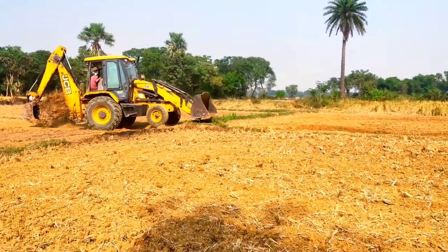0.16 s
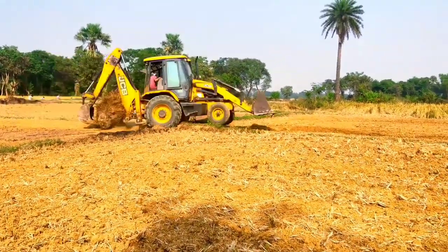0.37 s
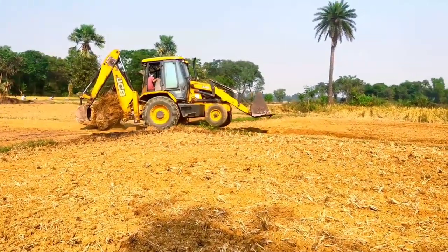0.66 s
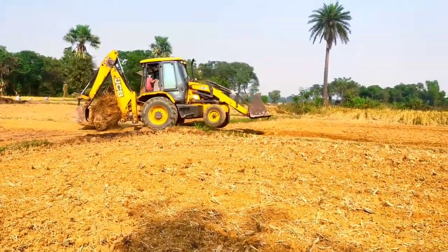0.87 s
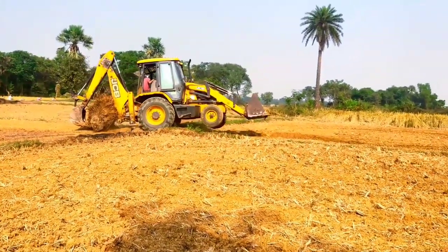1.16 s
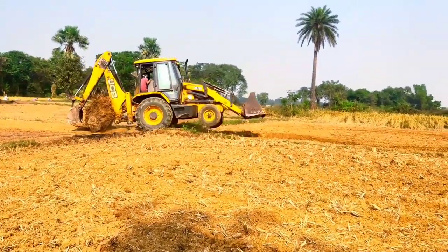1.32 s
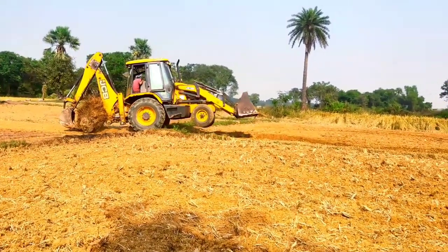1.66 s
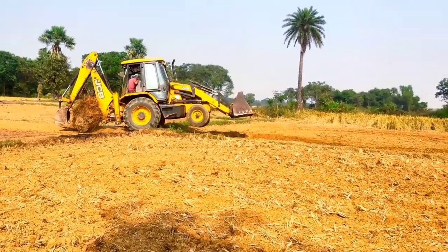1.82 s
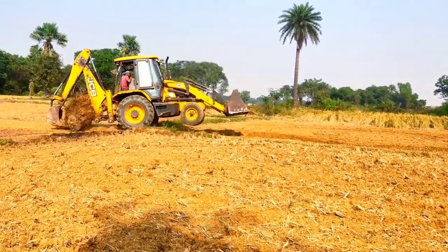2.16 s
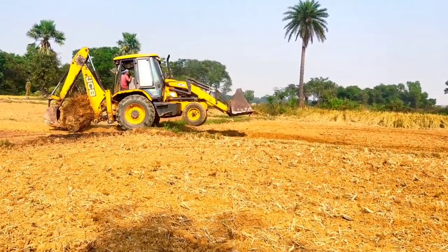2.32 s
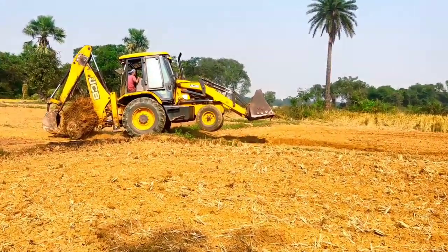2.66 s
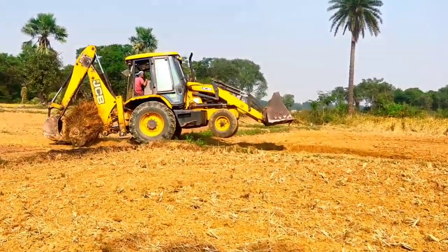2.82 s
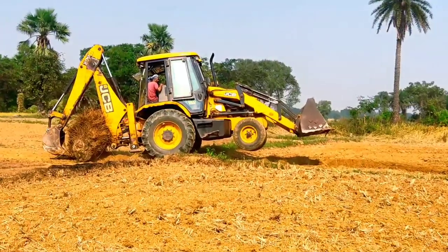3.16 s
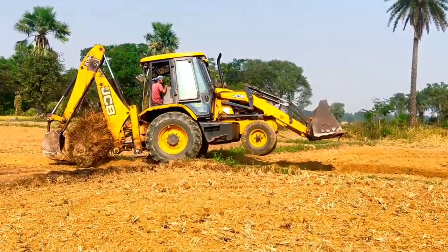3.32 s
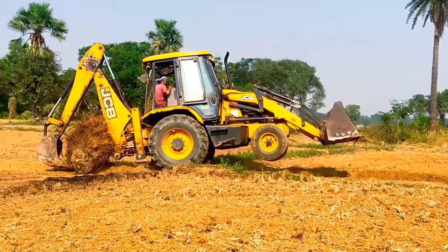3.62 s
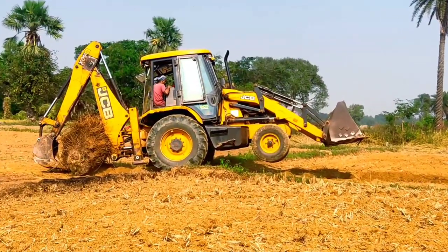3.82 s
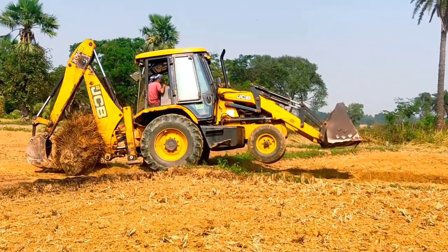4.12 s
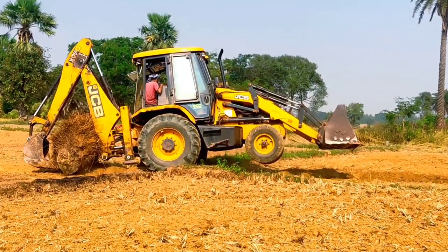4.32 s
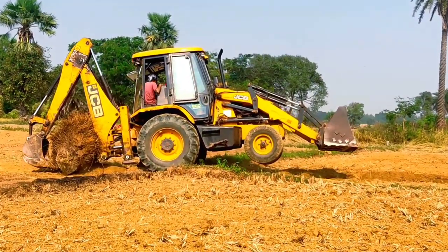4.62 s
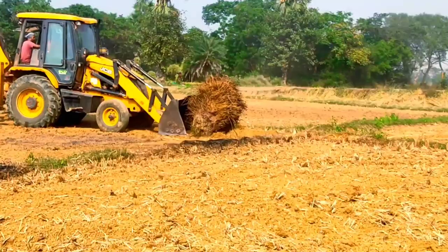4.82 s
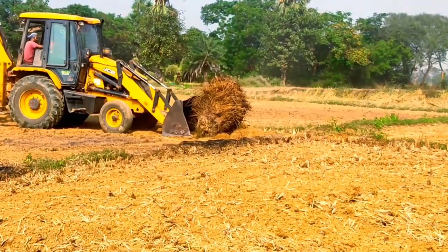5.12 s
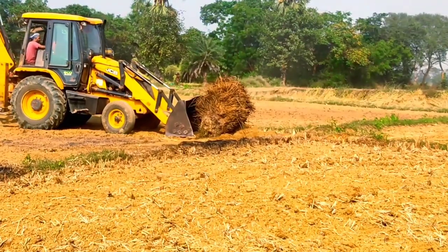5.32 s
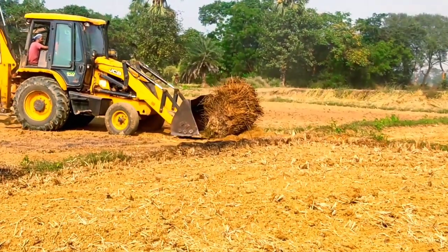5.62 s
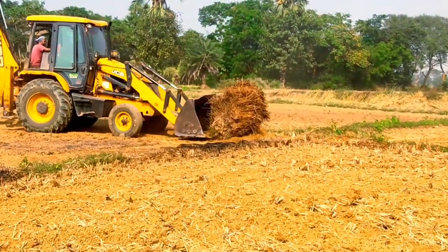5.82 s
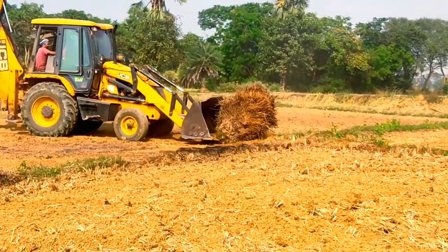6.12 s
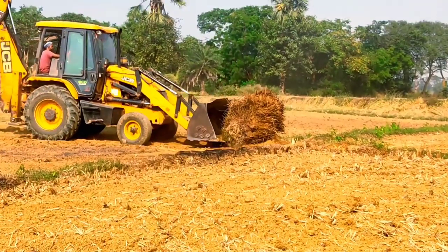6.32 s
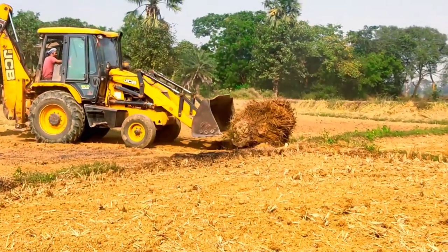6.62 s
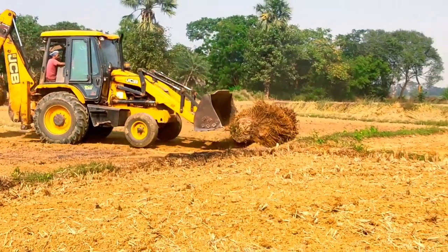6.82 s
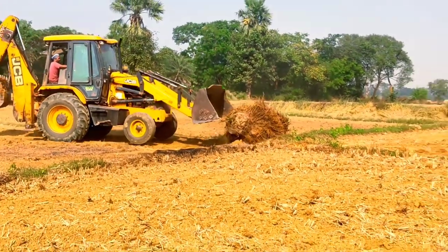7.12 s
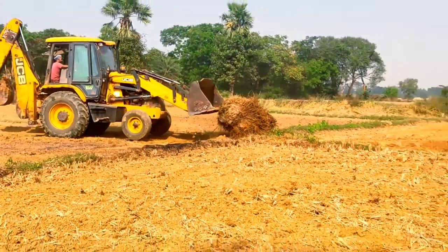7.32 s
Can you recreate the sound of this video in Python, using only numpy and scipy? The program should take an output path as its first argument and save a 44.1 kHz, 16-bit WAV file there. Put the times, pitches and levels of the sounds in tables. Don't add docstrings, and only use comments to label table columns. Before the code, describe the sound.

Continuous heavy engine noise outdoors, dry and slightly thin as from a phone microphone. Dense diesel firings pulse over a deep hum, with metallic clatter, shaking panels and faint gear whine. After a momentary dip the engine climbs, then drops into a chugging idle. The sound cuts sharply to working revs, wavering under load, with a brief pump drone and a final sag in pitch.

```python
import sys
import numpy as np
from scipy import signal
from scipy.fft import rfft, irfft
from scipy.io import wavfile
from scipy.ndimage import uniform_filter1d

SR = 44100
rng = np.random.default_rng(int(sys.argv[2]) if len(sys.argv) > 2 else 0)


def amplitude_ratio(level_db):
    exponent = np.asarray(level_db, float) / 20
    return 10 ** exponent


def to_wav(s):
    ch = np.atleast_2d(s).T
    pcm = np.round(np.clip(ch, -1, 1) * 32767)
    wavfile.write(sys.argv[1], SR, pcm.astype(np.int16))


N = 329427


def follow(t, curve):
    return np.interp(t, *np.transpose(curve))


def walk(n, rate):
    k = int(SR / rate)
    held = np.repeat(rng.standard_normal(n // k + 1), k)
    return 0.94 * uniform_filter1d(uniform_filter1d(held, k), k)[:n]


def pair(common, share, lag=0):
    share = np.clip(share, 0, 1)
    own = rng.standard_normal((2, len(common)))
    return np.sqrt(share) * np.array([common, np.roll(common, lag)]) + np.sqrt(1 - share) * own


# left notch in Hz, right notch in Hz, width in Hz.
GROUND = [(564, 580, 20), (604, 657, 120), (682, 650, 93)]


def hear(x, modes, ground=None):
    f = np.linspace(1, SR / 2, 2049)
    hz, width, *port_db = np.transpose(modes)[:, :, None]
    shape = 1 / (1 + ((f ** 2 - hz ** 2) / (width * f)) ** 2) ** 2
    power = np.sum(amplitude_ratio(np.array(port_db)) ** 2 * shape, axis=1)
    if ground:
        notch_hz = np.array(ground[:2])[:, None]
        power = power * (1 - .93 / (1 + ((f - notch_hz) / ground[2]) ** 2))
    ceps = irfft(np.log(power + 1e-14) / 2)
    ceps[:, 1:2048] *= 2
    ceps[:, 2049:] = 0
    response = irfft(np.exp(rfft(ceps)))
    y = signal.fftconvolve(x, response, axes=1)[:, :x.shape[1]]
    return y / np.std(y.mean(axis=0))


# time in seconds, firing rate in Hz.
REVS = [
    [(0.0, 59.5), (0.315, 58.8)],
    [(0.32, 55.82), (1.1, 58.15), (1.7, 59.12), (1.9, 52.6), (2.3, 59.9), (3.61, 62.9), (3.8, 48.93),
     (4.16, 30.7), (4.675, 29.83)],
    [(4.68, 58.2), (5.57, 54.85), (6.04, 59.68), (6.4, 54.84), (7.16, 58.48), (7.34, 48.87), (7.47, 47.4)],
]


def firing_rate(t, place):
    slew_s = .06
    return uniform_filter1d(follow(t, REVS[place]), int(slew_s * SR), mode="nearest")


WORK_HZ = 59.2
KNOCK_DB = [-32, -34.5, -34]
# time in seconds, effort in dB re full fuel.
EFFORT = [
    [(0.0, 1), (0.315, 1.5)],
    [(0.32, -1), (1.64, -0.5), (1.82, -7.5), (2.14, 0.5), (2.45, -0.5), (3.56, 1), (3.7, -8), (4.05, -21),
     (4.24, -13), (4.675, -19.5)],
    [(4.68, -1), (4.95, 1), (6.4, 0), (7.13, 2.5), (7.23, -6.5), (7.47, -1)],
]
# time in seconds, air left minus right in dB.
SWING = [
    [(0.0, 4), (0.315, 5.5)],
    [(0.4, -5.5), (0.64, -13.5), (0.8, -26), (1.2, -30), (4.675, -28)],
    [(4.7, -15), (4.93, -12), (5.35, -18), (5.9, -22), (7.47, -21)],
]
# level in dB at each of three positions,
# share of effort (no unit), speed slope in dB per octave.
LAYERS = [
    (-38, -38, -35.5, 0.6, 6.4),
    (-39.5, -41.5, -42.5, 0.43, 1.3),
    (-43, -43, -43.5, 0.33, 5.2),
    (-39, -40, -41.5, 0.41, 5.68),
]


def layer_levels(t, hz, place):
    effort_db = follow(t, EFFORT[place])
    octaves = np.log2(hz / WORK_HZ)
    parts = [row[place] + row[3] * effort_db + row[4] * octaves for row in LAYERS]
    return [KNOCK_DB[place] + effort_db, *parts, follow(t, SWING[place])]


# level in dB before the pipe
TONES_DB = [(-37, -61, -55.5), (-42, -56, -60.5), (-36, -54, -56)]
# pitch in Hz, gain in dB.
PIPE = [(30, -5.5), (45, -5), (54.5, 0), (59.5, 0), (72, 12.5), (92, 22), (120, 24), (180, 8)]
# start in seconds, end in seconds,
# change of the three tones in dB.
TONE_SHIFTS = [(1.71, 1.843, -14, -4, -5), (1.74, 2.198, 3.8, -5.5, -22), (3.645, 3.767, 1, -27, -7),
               (3.66, 4.18, -1.5, -2, -22), (4.12, 4.7, -7, 0, -1.2), (7.21, 7.3, -22, -9, -3),
               (7.2, 7.5, -4, -2.5, -17)]
WAVER_DB = [-1.5, 1.45, 5.5]


def tone_levels(t, hz, place):
    ramp_s = 0.066
    pipe_hz, pipe_gain_db = np.transpose(PIPE)
    levels = []
    for k, db in enumerate(TONES_DB[place]):
        pipe_db = np.interp(np.log((k + 1) * hz), np.log(pipe_hz), pipe_gain_db)
        shift_db = 0
        for t0, t1, *change_db in TONE_SHIFTS:
            inside = np.clip(np.minimum(t - t0, t1 - t) / ramp_s + .5, 0, 1)
            shift_db = shift_db + change_db[k] * inside
        waver_db = WAVER_DB[k] * (hz / WORK_HZ) ** 2 * walk(len(t), 14)
        levels.append(db + pipe_db + shift_db + waver_db)
    return levels


# multiple of the firing rate,
# level in dB re knock at each of three positions.
ORDERS_DB = [(1.499, -14, -14, -18), (2.5, -14.5, -14, -15), (4.001, -24, -19, -20),
             (4.25, -22, -22.5, -16.5), (6, -16, -14.5, -19), (7, -17, -8, -34.5), (7.5, -24, -16.5, -17)]


def exhaust(turn, tone_db, effort_db, place):
    n = len(turn)
    wander = 1.1 * walk(n, 12) * amplitude_ratio(np.minimum(effort_db + 36, 0))
    lead = 0.048 * np.array([[-.5], [.5]])
    tones = 0
    for k, db in enumerate(tone_db):
        phase = 2 * np.pi * (k + 1) * turn + 0.73 * k + lead
        tones = tones + amplitude_ratio(db) * np.sin(phase + (k == 2) * wander)
    for order, *db in ORDERS_DB:
        level = amplitude_ratio(effort_db + db[place] + 3.4 * walk(n, 6.07))
        tones = tones + level * np.sin(2 * np.pi * order * turn + 1.46 * walk(n, 6.09))
    pan_db = 4.0 * np.array([[.43], [-.57]])
    return np.sqrt(2) * tones * amplitude_ratio(pan_db)


CYLINDER_DB = [2.5, 3.5, 2.5, 4]


def puffs(turn, scatter_db, peak, sharp):
    k = turn.astype(int)
    scatter = scatter_db * rng.standard_normal(k[-1] + 1)[k]
    size_db = np.take(CYLINDER_DB, k % len(CYLINDER_DB)) + scatter
    swell = amplitude_ratio(size_db) * np.exp(sharp * np.cos(2 * np.pi * (turn % 1) ** peak + np.pi))
    return swell / np.mean(swell)


def combustion(turn):
    cycle = rng.standard_normal(3000)
    repeat = cycle[(turn / len(CYLINDER_DB) % 1 * len(cycle)).astype(int)]
    return np.sqrt(.4) * repeat + np.sqrt(.6) * rng.standard_normal(len(turn))


# time in seconds, peak level in dB.
KNOCKS = [(0.058, -19), (0.498, -21), (1.055, -20), (1.087, -20), (1.124, -27), (1.16, -19.5), (1.196, -24),
          (1.295, -18), (1.532, -20), (2.177, -18.5), (2.645, -19), (2.679, -24), (2.775, -23),
          (2.81, -16.5), (3.228, -19), (3.551, -20.5), (4.098, -40), (4.224, -28.5), (4.355, -33),
          (4.676, -34), (4.765, -22), (4.97, -22), (5.253, -23), (5.6, -18.5), (5.687, -19), (5.818, -30),
          (6.104, -22), (6.169, -29), (6.205, -24), (7.082, -23)]


def knocks(t, knock_db):
    blows = np.zeros(len(t))
    for s, db in KNOCKS:
        near = slice(*np.searchsorted(t, [s, s + .012]))
        age = t[near] - s
        ring = np.exp(-age / 0.0013) * np.sin(2 * np.pi * 1030 * age)
        blows[near] += amplitude_ratio(db - knock_db[near] - 13) * ring
    return blows


def firing_clock(t, turn):
    s = np.array([k[0] for k in KNOCKS if t[0] <= k[0] <= t[-1]])
    at = np.interp(s, t, turn) - .27
    return np.maximum(turn + np.interp(t, s, np.round(at) - at), 0)


def hush(t):
    s = np.transpose(KNOCKS)[0]
    wait = np.append(s, np.inf)[np.searchsorted(s, t)] - t
    return 1 - .75 * np.exp(-(wait / .007) ** 2)


# pitch in Hz, width in Hz, left port in dB, right port in dB.
BODY = [
    [(159, 61, -15, -2), (283, 110, 4, -4), (425, 130, -14, -13.5), (490, 200, -38.8, -26),
     (835, 110, -7.5, -5.5), (1033, 145, -3.5, -1), (1090, 100, -40.3, -5)],
    [(154, 59, 3, 4), (235, 356, 9, 6.5), (405.7, 178, 3.5, 0.5), (568, 15, -42, -3.5),
     (799, 55, -5.5, 0.5), (992, 170, 3, 4), (1184, 210, -45, -7)],
    [(161, 68, 17, 13.5), (223, 83, 9, -15.5), (426, 247, -4, -4), (591, 37, -34.0, 0), (824, 70, -5, -21),
     (1023, 227, -4.5, -2.5), (1164, 95, -17, -5.5)],
]


def block(t, blow, puff, knock_db, place):
    stroke = (1.3 + puff) * hush(t)
    strikes = pair(blow, 0.95, -1.5) * stroke + 2.9 * knocks(t, knock_db)
    return hear(strikes, BODY[place][4:], GROUND[place])


def panels(blow, puff, place):
    return hear(pair(blow, 0.97, -2.5) * (1.24 + puff), BODY[place][2:4], GROUND[place])


# pitch in Hz, width in Hz, left port in dB, right port in dB.
RUMBLE = [(43.7, 31, 0, -17), (87, 68, -0.5, -11), (314.4, 83, -14, 5)]
FRAME_DB = [-4, 0.5, -2.5]


def frame(blow, puff, place):
    thrum = pair(blow, .985, -8) * (2.5 + puff)
    return amplitude_ratio(FRAME_DB[place]) * hear(thrum, BODY[place][:2] + RUMBLE[2:], GROUND[place])


def rumble(n):
    return hear(pair(rng.standard_normal(n), 1.0), RUMBLE[:2])


# pitch in Hz, width in Hz, left port in dB, right port in dB.
VALVES = [
    [(1590, 800, -13.5, 0), (2090, 310, -18, -12), (2520, 400, -5, -5), (3140, 370, -53.4, -20.3),
     (3600, 1500, -20, -18)],
    [(1755, 570, -20, -9.5), (1940, 79, -27.5, -7), (2580, 770, -19, -16.5), (2970, 130, -17, -41),
     (3760, 480, -25, -15)],
    [(1637, 320, -16, -4.5), (1968, 126, -12, -2.5), (2334, 580, -17, -6.5), (3380, 550, -14.5, -11.5),
     (4090, 650, -18.5, -17)],
]
RIGHT_LAG_S = [.0006, 0.000936, .0007]


def valve_gear(puff, place):
    lag = int(RIGHT_LAG_S[place] * SR)
    rattle = pair(rng.standard_normal(len(puff)), .7, lag) * (2.6 + puff)
    return hear(rattle, VALVES[place])


# pitch in Hz, width in Hz, left port in dB, right port in dB.
AIR = [
    [(4450, 1100, -22, -18), (5950, 1670, -26, -11), (7120, 440, -14, -21), (8100, 660, -14.5, -34.2),
     (8610, 950, -13, -39), (10350, 1060, -71.3, -47), (13130, 710, -43, -54.1)],
    [(4720, 500, -63.2, -27), (5910, 2640, -46, -24), (7270, 570, -47, -15.5), (7920, 400, -58, -18),
     (8570, 440, -50, -24), (11180, 1000, -87.4, -45), (13600, 2600, -68, -46)],
    [(5020, 1800, -28, -22.5), (5940, 600, -49, -14.5), (6880, 330, -44, -6.5), (7560, 470, -35, -12.5),
     (8000, 2250, -39.5, -22.5), (10850, 3300, -79.5, -35.5), (13200, 1330, -46.5, -72.7)],
]
AIR_CLIMB = [0, 0, 0.04]


def blown(x, place):
    climb, modes = AIR_CLIMB[place], np.array(AIR[place])
    if not climb:
        return hear(x, modes)
    fade = np.linspace(0, np.pi / 2, x.shape[1])
    low = hear(x, modes * [1 - .5 * climb, 1, 1, 1])
    high = hear(x, modes * [1 + .5 * climb, 1, 1, 1])
    return np.cos(fade) * low + np.sin(fade) * np.roll(high, 999, axis=1)


AIR_SWELL_DB = [3, 0.6, 0.93]


def cooling_air(t, hz, blow, puff, cycle_db, load, place):
    knock_db, air_db, air_pan_db = load
    fuel = amplitude_ratio(2 * np.minimum(knock_db - KNOCK_DB[place], 0))
    swell_db = AIR_SWELL_DB[place] * (t - t[0]) * fuel
    flutter_db = .8 * walk(len(t), 11)
    gusts = pair(blow, 0) * (3.5 * 58 / hz + puff)
    air = amplitude_ratio(air_db + cycle_db + swell_db + flutter_db) * blown(gusts, place)
    air[0] *= amplitude_ratio(air_pan_db - np.median(air_pan_db))
    return air


# pitch in Hz, width in Hz, left port in dB, right port in dB.
WHINE = [(2590, 50, 2, 1.5), (3725, 96, -8, -1), (5734, 114, -37, 1.5)]


def gear_whine(n):
    return amplitude_ratio(-17) * hear(pair(rng.standard_normal(n), 0.55), WHINE)


# pitch in Hz, width in Hz, left port in dB, right port in dB.
HOUSING = [(257.4, 7.5, 11.5, 1), (503, 24, 7, 1.5), (902, 78, 5, 5.5), (1153, 109, 0.5, 5.5)]


def housings(blow, puff):
    return amplitude_ratio(-46.5) * hear(pair(blow, 0.85) * (1.3 + puff), HOUSING, GROUND[1])


def machinery(t, turn, hz, load, place):
    knock_db, panel_db, valve_db, air_db, drone_db, air_pan_db = load
    n, turn = len(turn), firing_clock(t, turn)
    puff = puffs(turn, scatter_db=1.3, peak=.7, sharp=.95 * (58 / hz) ** .6)
    blow = combustion(turn)
    cycle_db = np.cos(np.pi / 2 * (turn - 1.4))

    struck = block(t, blow, puff, knock_db, place)
    if place == 1:
        struck = struck + gear_whine(n)
    mix = amplitude_ratio(knock_db + 0.29 * cycle_db + 0.43 * walk(n, 14)) * struck
    mix = mix + amplitude_ratio(panel_db + 0.57 * walk(n, 8.536)) * panels(blow, puff, place)
    mix = mix + amplitude_ratio(drone_db) * frame(blow, puff, place)
    mix = mix + amplitude_ratio(-48 + 0.2 * (drone_db + 41.5)) * rumble(n)
    mix = mix + amplitude_ratio(valve_db + walk(n, 16)) * valve_gear(puff, place)
    mix = mix + cooling_air(t, hz, blow, puff, cycle_db, (knock_db, air_db, air_pan_db), place)
    if place == 1:
        mix = mix + housings(blow, puff)
    return mix


# time in seconds, pitch in Hz, level in dB.
PUMP = [
    (5.0, 338.1, -53.5),
    (5.662, 330.3, -34.5),
    (5.8, 322, -54),
    (5.85, 324.4, -58),
]


def pump():
    s, hz, db = np.transpose(PUMP)
    t = np.arange(N) / SR
    turn = np.cumsum(np.interp(t, s, hz)) / SR
    level = amplitude_ratio(np.interp(t, s, db, left=-90, right=-90))
    return np.sqrt(2) * level * np.sin(2 * np.pi * turn)


CUTS_S = [
    .315,
    4.6752,
]


def scene():
    cuts = [int(s * SR) for s in CUTS_S]
    parts, turn = [], [0]
    for place, t in enumerate(np.split(np.arange(N) / SR, cuts)):
        hz = firing_rate(t, place)
        load = layer_levels(t, hz, place)
        turn = turn[-1] + np.cumsum(hz) / SR
        effort_db = load[0] + .8 * np.minimum(hz - 57, 0)
        hum = exhaust(turn, tone_levels(t, hz, place), effort_db, place)
        parts.append(hum + machinery(t, turn, hz, load, place))
    return np.hstack(parts) + pump()


# start in seconds, end in seconds, centre in Hz, width in Hz.
OPPOSED = [(0, .68, 3600, 332), (0.048, .3, 4230, 200), (.7, 4, 3270, 70), (4.85, 5.2, 3600, 151.9),
           (5.002, 5.3, 3005, 149.5), (5.6, 6.6, 3032, 108), (6.602, 7.45, 3081, 380.2)]


def thin_weak_bands(x, start):
    f, t, z = signal.stft(x, SR, nperseg=2048)
    loud = uniform_filter1d(np.mean(abs(z) ** 2, axis=(0, 1)), size=9)
    band = (f / 260).astype(int)
    f = f[:, None]
    edges = np.flatnonzero(np.diff(band, prepend=-1))
    mean = np.add.reduceat(abs(z) ** 2, edges, axis=1) / np.bincount(band)[:, None]
    chance = rng.standard_normal((2, *mean.shape))
    patchy = uniform_filter1d(chance[0], size=2) + 3 * uniform_filter1d(chance[1], size=16)
    treble_db = 5.5 * (f > 9100) + 6 * np.clip(f / 1000 - 13.5, 0, 9)
    step_db = -29 + 8 * patchy[:, band] + treble_db
    z = z * ((mean[:, band] > loud * amplitude_ratio(2 * step_db)) | (f < 3200))
    for t0, t1, hz, width in OPPOSED:
        in_band = abs(f - hz - 60 * patchy[1, 3]) < width / 2
        in_time = abs(t + start - (t0 + t1) / 2) < (t1 - t0) / 2
        z = z - z.mean(axis=0) * (in_band & in_time & (chance[0, 0, band] > -.4))
    return signal.istft(z, SR, nperseg=2048)[1][:, :x.shape[1]]


def top_cut(x):
    return signal.sosfilt(signal.butter(12, 15740, fs=SR, output="sos"), x)


def record(dry):
    rounded = np.tanh(2.572 * dry) / 2.465
    bass_cut = signal.butter(2, 26, "high", fs=SR, output="sos")
    splice_s = CUTS_S[1]
    before, after = np.split(signal.sosfilt(bass_cut, rounded), [int(splice_s * SR)], axis=1)
    mix = np.hstack([thin_weak_bands(before, 0), thin_weak_bands(after, splice_s)])
    return top_cut(mix)


dry = scene()
out = record(dry)
to_wav(out)
```